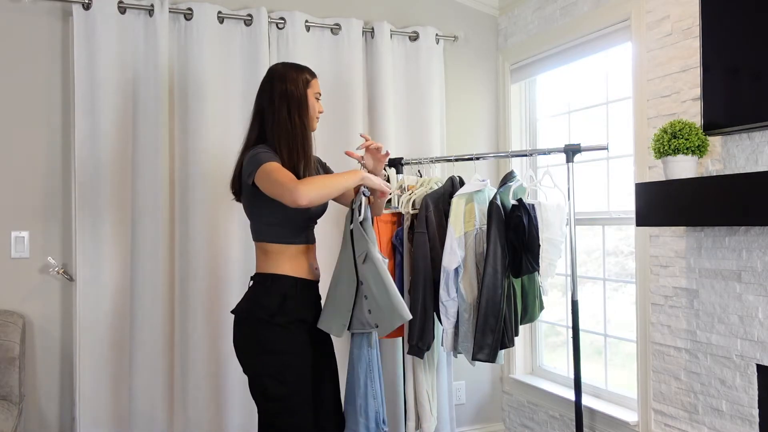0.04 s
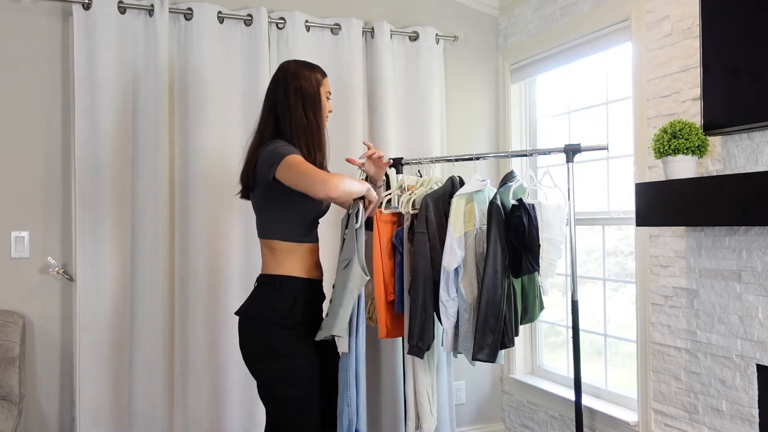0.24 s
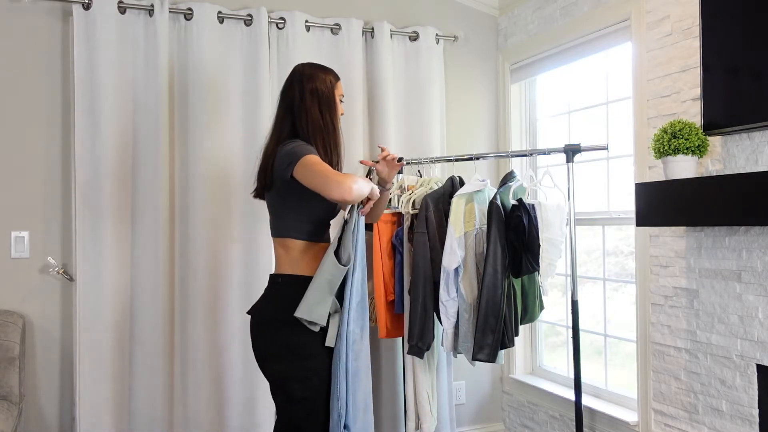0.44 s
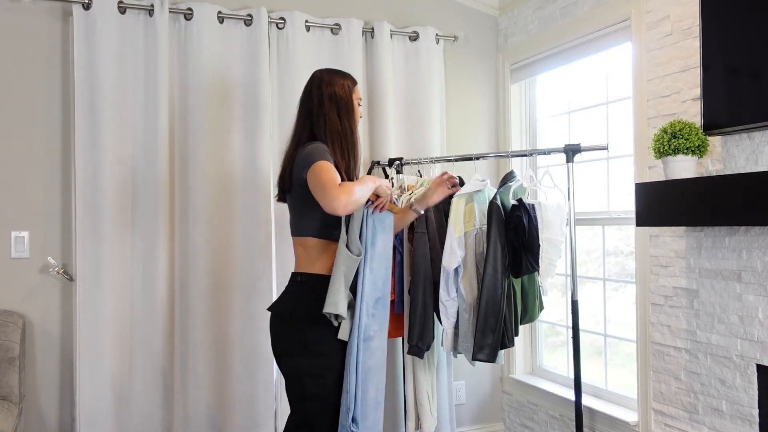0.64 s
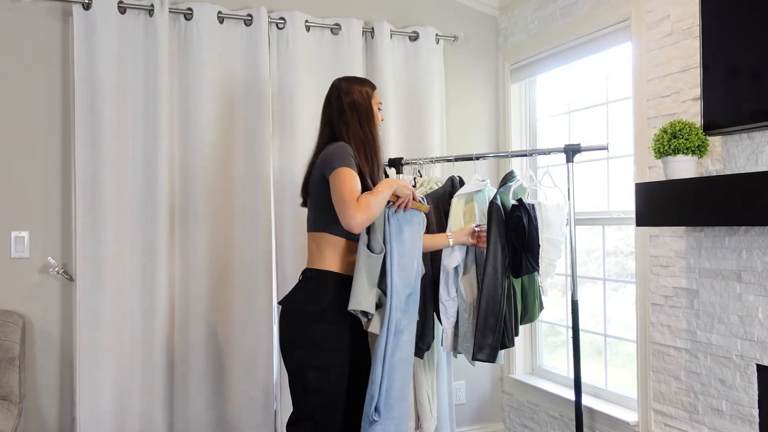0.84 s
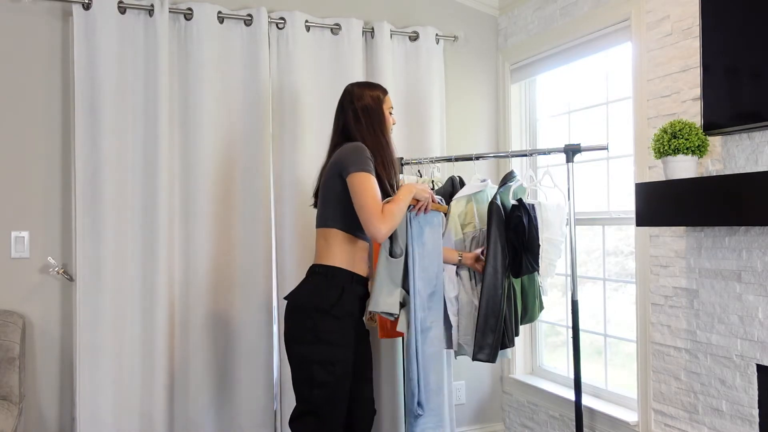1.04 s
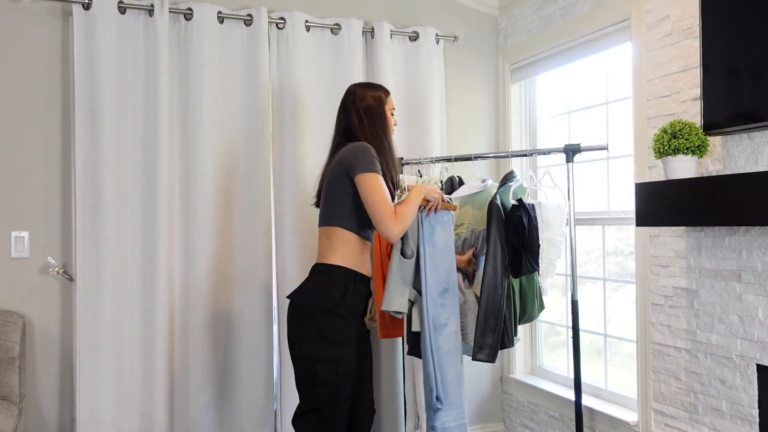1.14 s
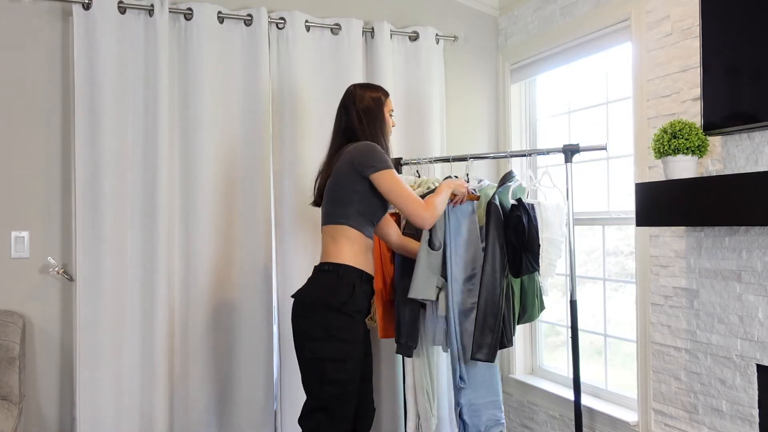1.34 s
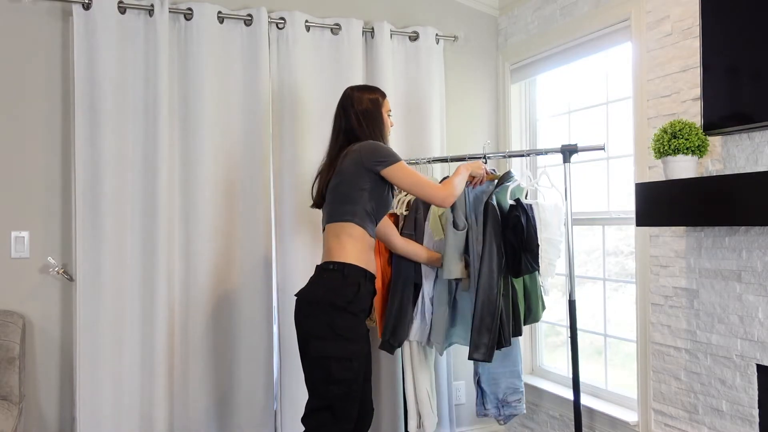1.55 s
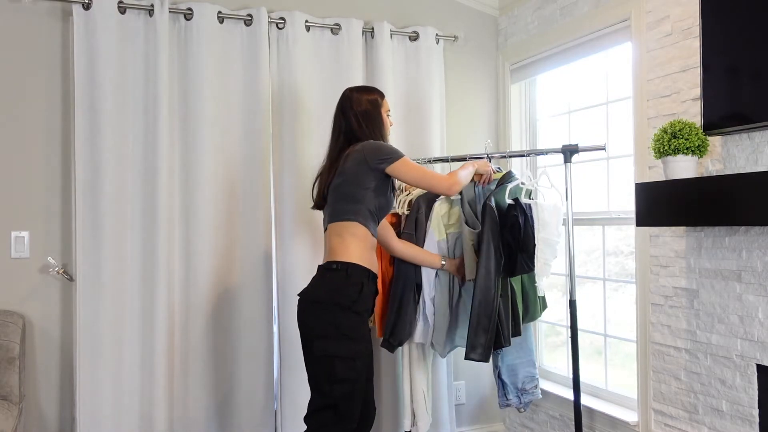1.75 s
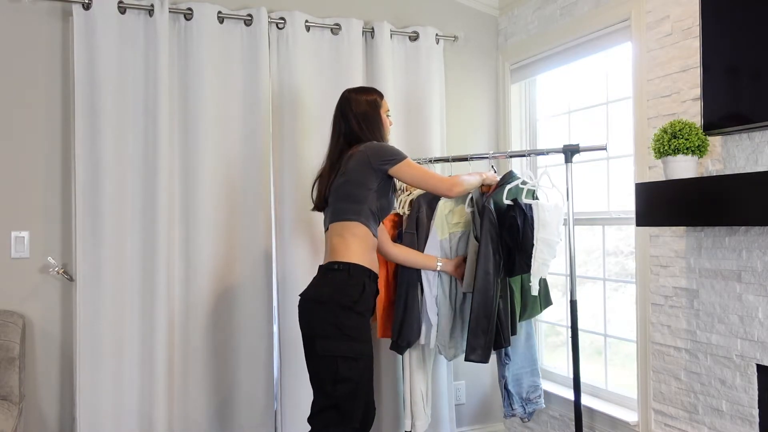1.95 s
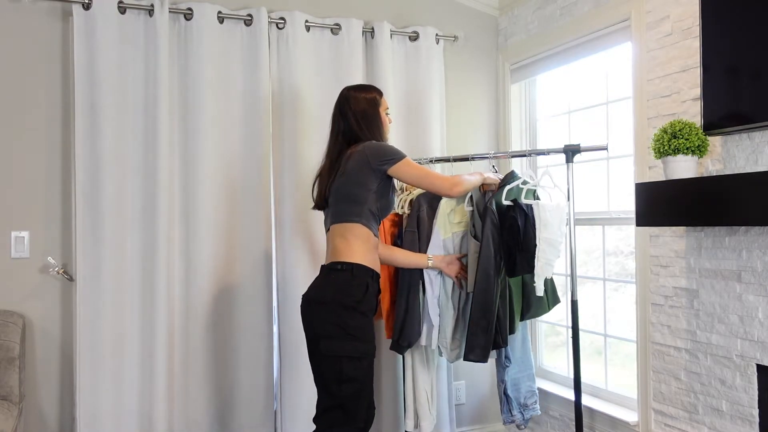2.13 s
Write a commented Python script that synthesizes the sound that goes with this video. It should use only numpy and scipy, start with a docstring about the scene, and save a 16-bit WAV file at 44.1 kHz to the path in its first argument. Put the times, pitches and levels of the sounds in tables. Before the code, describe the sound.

Soft garment rustling and light hanger taps lead to one muted rack knock, a pause, then loud bright hanger hooks clattering on the rail with short ringing; lively small room, faint fan hum, microphone some steps away.

```python
"""A quiet living room, where clothes hangers are moved along a metal rail.
Soft taps and a rustle come first, then one dull knock against the rack with hooks ticking around it.
Then a hanger clacks onto the rail and its wire hook chatters against its neighbours.
Hits are filtered clicks plus dying sine waves, and the room adds reflections to the clicks and knocks.
Rustle, shudder and fan are coloured noise; a wavering sine adds the fan's hum."""
import sys
import numpy as np
from scipy import signal
from scipy.fft import rfft, irfft
from scipy.io import wavfile

SR = 44100
rng = np.random.default_rng(int(sys.argv[2]) if len(sys.argv) > 2 else 0)


def master_out(mix):
    """Clip the mix to full scale and print it as 16-bit PCM to the path in sys.argv[1]."""
    frames = np.transpose(np.atleast_2d(mix))
    ceiling = np.clip(frames, -1, 1)
    pcm = np.round(ceiling * 32767).astype(np.int16)
    wavfile.write(sys.argv[1], SR, pcm)


N = 96402

# All levels of hanger, handling and rack sounds are set before the left/right balance.
# Hook hitting rail: [t/s, level/dB, midrange boost/dB, treble boost/dB, hanger body ring/dB]
HOOK_CLACKS = [(1.739, -7.5, 2.5, 3.5, 2), (1.7405, -6.5, 6.5, -2.5, 3), (1.8642, 2, -13.5, 2, -17.5),
               (1.8845, -12, -22, 17, -22), (1.8867, 3, -16, 1, -31), (1.8890, 1, -15, 6.5, -39),
               (1.9000, -2, -10, 3, -35), (1.9273, -7.5, 2.5, -1, -16), (1.930, 3.5, -1, -0.5, -23.5),
               (1.9339, -0.5, 2.5, -14, -12)]
# Sharp sound of hook on rail: [f/Hz, relative level/dB]
CLACK_COLOUR = [(40, -33), (150, -25), (400, -16.5), (800, -5.5), (1500, -2.5), (2800, 1), (4600, 2),
                (5900, -3.5), (7100, 1), (8300, -5.5), (9100, -10.5), (10700, -9), (13200, -21),
                (15200, -24)]
# Ringing tones of the hanger's body: [f/Hz, relative level/dB, time to fall 60 dB/s]
BODY_TONES = [(1473, 1.5, 0.078), (1576, -2, 0.051), (1730, -9.5, 0.11), (1898, 3.5, 0.043),
              (2147, 0.5, 0.09), (2214, -9, .07), (2267, -2.5, .06), (3283, -7, .05), (3530, -2, .06),
              (4620, -9, 0.037)]
# Longer ringing tones of hooks and rail: [f/Hz, relative level/dB, time to fall 60 dB/s]
WIRE_TONES = [(1465, -1, 0.46), (2120, -17, 0.22), (2650, -8.5, 0.91), (2824, 1, 0.42), (3260, 1, .4),
              (3820, 1.5, 0.52), (3792, -1, 0.42), (4015, -26, 0.39), (4370, -5, 0.25), (4400, 3, .38),
              (4670, -1, 0.21), (4930, -1.5, 0.45), (5311, 1, 0.49), (7100, -7, 0.28), (6800, -12, 0.47),
              (7330, -10, 0.32), (7740, -9, 0.46), (10740, -8, 0.26)]

# Dull knock against the rack, a single row: [t/s, level/dB]
RACK_KNOCK = (.5442, -11)
# Thud of the knock: [f/Hz, relative level/dB]
KNOCK_COLOUR = [(25, -30), (80, -12), (150, -23.5), (215, -2), (320, 3), (560, -1), (1000, -8.5),
                (2000, -10.5), (3000, -16), (4000, -10.5), (6000, -35), (15000, -45)]
# Ringing tones of the rack: [f/Hz, relative level/dB, time to fall 60 dB/s]
RACK_TONES = [(224, -0.5, 0.11), (318, 5, 0.081), (398, -2.5, .24), (552, -10, 0.15), (699, -9, 0.22)]
# The laden rack shudders, most strongly just after the last clacks: [t/s, level/dB]
SHUDDER_LEVEL = [(1.55, -109), (1.75, -78), (1.92, -78), (1.96, -70), (2.19, -85)]
# Low rumble of the shudder: [f/Hz, relative level/dB]
SHUDDER_COLOUR = [(20, -11), (55, 10), (110, 11), (190, 16), (400, -35), (2000, -64)]

# Hangers nudged in the hand: [t/s, level/dB]
HAND_TAPS = [(.044, -26), (.053, -29.5), (.108, -32), (.163, -34), (.265, -26), (.278, -48)]
# Soft sound of those taps: [f/Hz, relative level/dB]
TAP_COLOUR = [(100, -25), (400, 3.5), (800, 7), (1700, 3), (2700, -7), (4200, -9), (7000, -28),
              (15000, -34)]
# Hooks ticking together around the knock: [t/s, level/dB]
HOOK_TICKS = [(.541, -14.5), (.553, -16), (.5572, -22)]
# Bright sound of those ticks: [f/Hz, relative level/dB]
TICK_COLOUR = [(100, -44), (1000, -5.5), (2900, -2.5), (3900, 7), (4700, 2), (5400, 2), (6100, -4),
               (8300, -5), (9800, -3), (11000, -12.5), (15500, -22)]
# Loudness of the cloth rustle: [t/s, level/dB]
RUSTLE_LEVEL = [(0, -65), (.09, -63.5), (.2, -63.5), (.35, -64.5), (.5, -69), (.75, -65), (1.0, -71.5),
                (1.6, -78.5)]
# Sound of the cloth: [f/Hz, relative level/dB]
RUSTLE_COLOUR = [(100, -44), (400, -2.5), (1500, -3), (2800, -6), (4200, -6.5), (7000, -17), (15000, -30)]

# Moving air: [f/Hz, relative level/dB]
AIR_COLOUR = [(25, -50), (50, -38), (90, -13.5), (160, -11), (250, -2), (370, -3.5), (560, -4.5),
              (760, -2.5), (950, -8.5), (1400, -9), (1900, -8), (2400, -15.5), (3000, -12.5), (3600, -19),
              (5500, -22.5), (9000, -26), (16000, -29.5)]
# Stereo spread of the air: [f/Hz, left/right difference compared with shared sound/dB]
AIR_SPREAD = [(40, -10), (120, -8.5), (380, -1.5), (1000, 0.5), (2400, -2), (8000, -0.5), (14000, -12)]
# Fan resonances: [f/Hz, distance from centre to -6 dB/Hz, left level/dB, right level/dB, stereo width]
FAN_WHIRR = [(661.3, 34, -69.5, -60, 0.74), (276, 51, -67.5, -68.5, 0.66), (1900, 135, -69, -79.5, .8)]
# How long the room's tail lasts: [f/Hz, time to fall 60 dB/s]
ROOM_DECAY = [(100, 0.37), (400, 0.58), (1500, 0.54), (4500, 0.48), (8000, 0.39), (14000, 0.35)]

WIRE_DB, RACK_DB = -10.5, -4.5  # ring compared with its hit
LEFT_DB, RIGHT_DB = -1.5, -0.37
# Reflections compared with the direct sound: the near cluster, then the tail
NEAR_DB, NEAR_RISE_S, NEAR_LENGTH_S = 11, 0.0011, 0.012
ROOM_DB, SOFT_ROOM_DB, ROOM_BUILD_S = 7.5, 7, 0.018
# Stereo widths: 0 is the same on both sides, 1 is unrelated
NEAR_WIDTH, ROOM_WIDTH, RUSTLE_WIDTH, SHUDDER_WIDTH = 0.33, 0.54, 0.88, 0.3
AIR_DB, HUM_HZ, HUM_DB = -62, 308.2, -63.5
HUM_WAVER = 0.043  # rms wander: share of the level, and radians of phase
EDGE_HZ = 15900


def hangers():
    """Each contact is a hard click with a short ring of the hanger's body; hooks and rail ring on."""
    out = np.zeros((2, N))
    for s, db, mid_db, top_db, body_db in HOOK_CLACKS:
        hit = click(CLACK_COLOUR, mid_db, top_db) + amp(body_db) * ring(BODY_TONES)
        add(out, s, amp(db) * room(hit, ROOM_DB))
        wire = unit(widen([ring(WIRE_TONES), ring(WIRE_TONES)], ROOM_WIDTH))
        add(out, s, amp(db + WIRE_DB) * wire)
    return out


def rack():
    """A knock makes the frame ring dully; low noise is its shudder under the hung clothes."""
    out = swell(SHUDDER_LEVEL) * noise(lambda hz: read(SHUDDER_COLOUR, hz), SHUDDER_WIDTH)
    s, db = RACK_KNOCK
    hit = click(KNOCK_COLOUR) + amp(RACK_DB) * ring(RACK_TONES)
    add(out, s, amp(db) * room(hit, SOFT_ROOM_DB))
    return out


def handling():
    """Shifting garments by hand gives short taps and hook ticks, with cloth friction as noise."""
    out = swell(RUSTLE_LEVEL) * noise(lambda hz: read(RUSTLE_COLOUR, hz), RUSTLE_WIDTH)
    for hits, colour in (HAND_TAPS, TAP_COLOUR), (HOOK_TICKS, TICK_COLOUR):
        for s, db in hits:
            add(out, s, amp(db) * room(click(colour), SOFT_ROOM_DB))
    return out


def fan():
    """Moving air, a few fuzzy resonances and one slightly wavering hum line."""
    air_width = amp(read(AIR_SPREAD, np.fft.rfftfreq(N, 1 / SR)))
    out = amp(AIR_DB) * noise(lambda hz: read(AIR_COLOUR, hz), air_width)
    for centre, width, left_db, right_db, spread in FAN_WHIRR:
        band = noise(lambda hz: -20 * np.log10(1 + ((hz - centre) / width) ** 2), spread)
        out = out + amp([[left_db], [right_db]]) * band
    # Slow noise, mostly below 8 Hz, moves the hum's level; played backwards it moves the phase
    drift = noise(lambda hz: -20 * np.log10(1 + (hz / 8) ** 2), 0.59)
    turn = 2 * np.pi * HUM_HZ * np.arange(N) / SR
    hum = (1 + HUM_WAVER * drift) * np.sin(turn + HUM_WAVER * drift[:, ::-1])
    return out + amp(HUM_DB) * np.sqrt(2) * hum


def room(sound, room_db):
    """Direct sound, a tight cluster of reflections from wall and window, and a diffuse tail."""
    t = np.arange(SR * 3 // 4) / SR
    cluster = rng.choice([-1., 1.], (2, len(t)))
    cluster = cluster * (1 - np.exp(-t / NEAR_RISE_S)) / (1 + (t / NEAR_LENGTH_S) ** 6)
    # The tail is noise cut into frequency bands, each fading at its own rate
    hz, at, bands = signal.stft(rng.standard_normal((2, len(t))), SR, nperseg=256)
    bands = bands * amp(-60 * at / read(ROOM_DECAY, hz)[:, None])
    tail = signal.istft(bands, SR)[1][:, :len(t)]
    tail = tail * (1 - np.exp(-(t / ROOM_BUILD_S) ** 2))
    direct = t == 0
    near = amp(NEAR_DB) * unit(widen(cluster, NEAR_WIDTH))
    far = amp(room_db) * unit(widen(tail, ROOM_WIDTH))
    return signal.fftconvolve(sound[None], unit(direct + near + far), axes=1)


def click(colour, mid_db=0, top_db=0, size=4096):
    """A hit starts at once and dies quickly; its colour can have the midrange and treble boosted."""
    hz = abs(np.fft.fftfreq(size, 1 / SR))
    gain = amp(read(colour, hz))
    mid = mid_db / (1 + (hz / 2700) ** 4) * hz ** 2 / (hz ** 2 + 500 ** 2)
    top = top_db * (1 - 1 / (1 + (hz / 7500) ** 4))
    gain = gain / np.sqrt(np.mean(gain ** 2)) * amp(mid + top)
    # The Hilbert transform finds the phase that puts the energy as early as possible
    wave = np.fft.ifft(np.exp(np.conj(signal.hilbert(np.log(gain + 1e-6))))).real
    return np.pad(wave[:size // 2], (0, SR // 2 - size // 2))


def ring(modes, detune=0.00093):
    """Dying sine waves of total energy 1; the object radiates little below its first listed tone."""
    t = np.arange(SR // 2) / SR
    wave = np.zeros(len(t))
    for hz, db, t60 in modes:
        sign = rng.choice([-1, 1])
        pitch = hz * (1 + detune * rng.normal())  # slightly different each time
        wave += amp(db - 60 * t / t60) * sign * np.sin(2 * np.pi * pitch * t)
    low_cut = signal.butter(2, modes[0][0], "high", fs=SR, output="sos")
    return unit(signal.sosfilt(low_cut, wave))


def noise(colour, width):
    """Stereo noise of rms 1; colour gives dB by frequency, width is one value or one per frequency."""
    spectrum = widen(rfft(rng.standard_normal((2, N))), width)
    spectrum = spectrum * amp(colour(np.fft.rfftfreq(N, 1 / SR)))
    return unit(irfft(spectrum, N)) * np.sqrt(N)


def swell(points):
    """Turns a level curve into a gain for every sample."""
    return amp(np.interp(np.arange(N) / SR, *np.transpose(points)))


def widen(pair, width):
    """Makes left and right partly alike by adding and subtracting a second signal."""
    return np.array([pair[0] + width * pair[1], pair[0] - width * pair[1]])


def add(mix, s, sound):
    """Mixes a stereo sound in at time s, in seconds."""
    part = mix[:, round(s * SR):][:, :sound.shape[1]]
    part += sound[:, :part.shape[1]]


def read(points, hz):
    """Joins table points by straight lines over log frequency."""
    f, value = np.transpose(points)
    return np.interp(np.log(hz + 1), np.log(f + 1), value)


def unit(x):
    """Scales to an energy of 1, averaged over the channels."""
    return x / np.sqrt(np.mean(np.sum(x ** 2, -1)) + 1e-20)


def amp(db):
    """Turns decibels into gain."""
    return 10 ** (np.asarray(db) / 20)


def scene():
    """The rack stands a little to the right, so it is louder there; the fan fills the room."""
    clothes_rail = hangers() + rack() + handling()
    return clothes_rail * amp([[LEFT_DB], [RIGHT_DB]]) + fan()


def record(dry):
    """A low-pass filter removes the highest treble."""
    low_pass = signal.firwin(511, EDGE_HZ, window=("kaiser", 9), fs=SR)
    return signal.oaconvolve(dry, low_pass[None], "same")


dry = scene()
out = record(dry)
master_out(out)
```